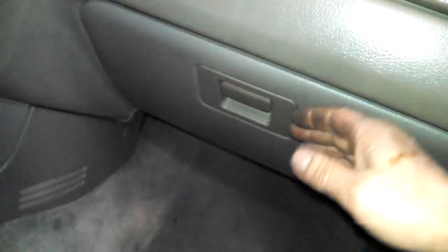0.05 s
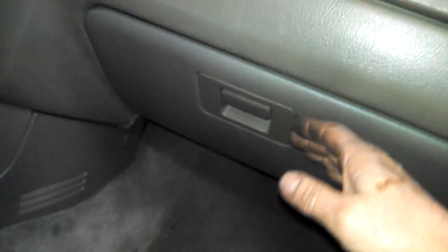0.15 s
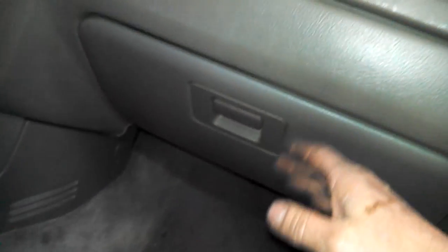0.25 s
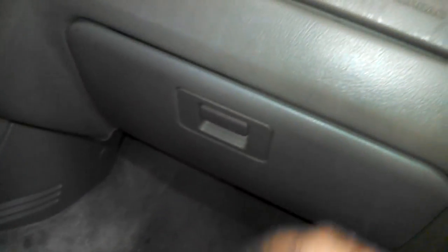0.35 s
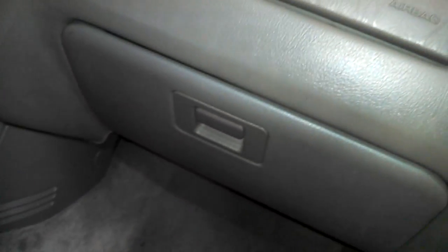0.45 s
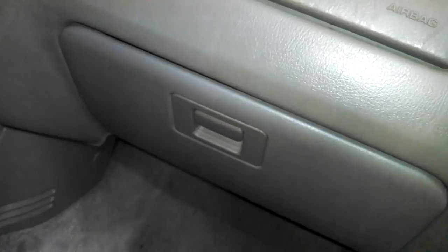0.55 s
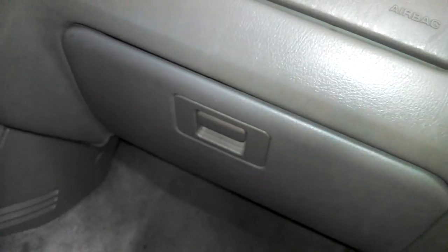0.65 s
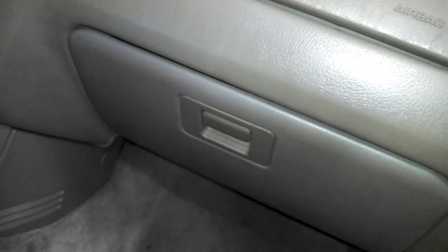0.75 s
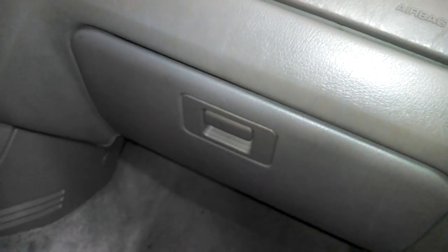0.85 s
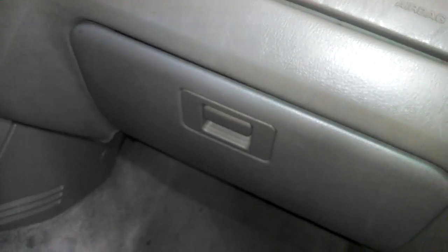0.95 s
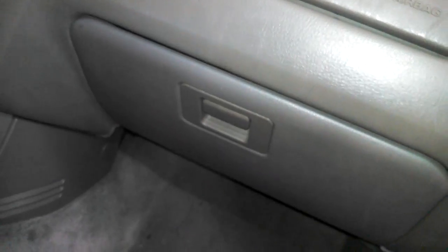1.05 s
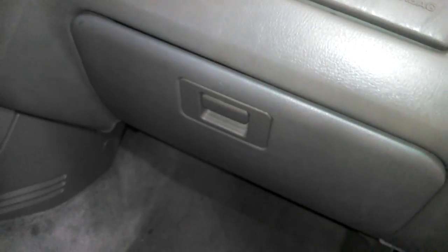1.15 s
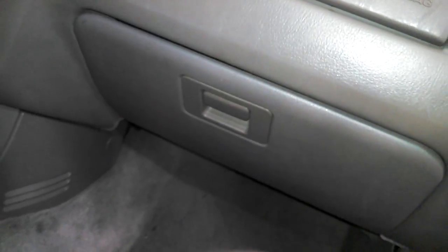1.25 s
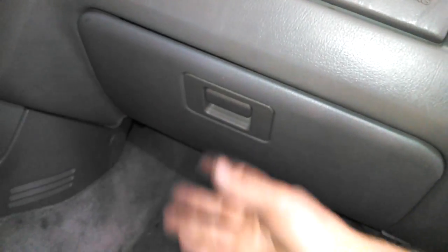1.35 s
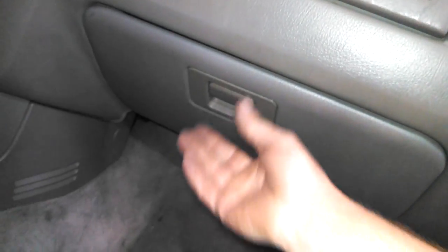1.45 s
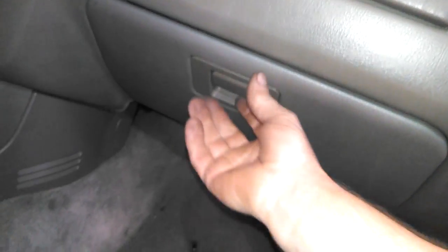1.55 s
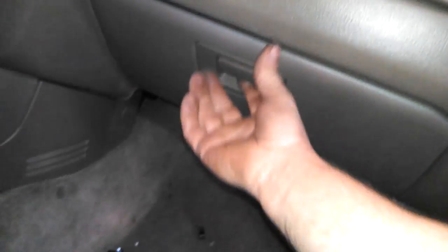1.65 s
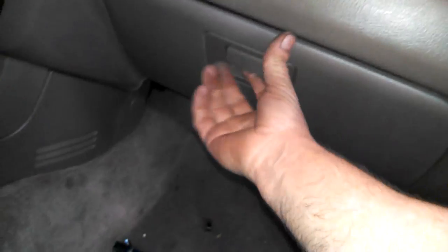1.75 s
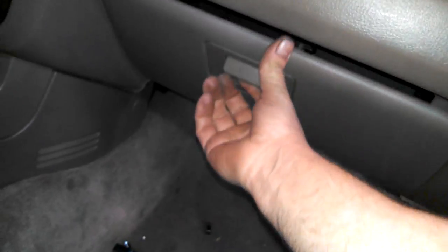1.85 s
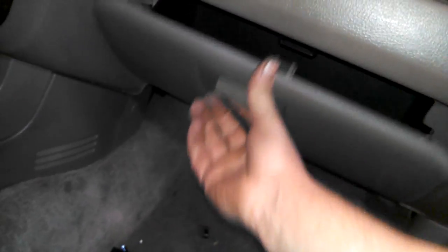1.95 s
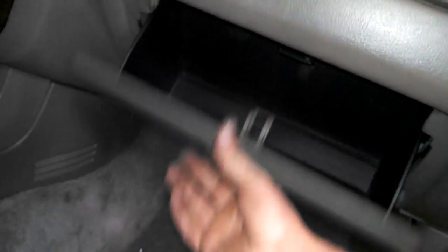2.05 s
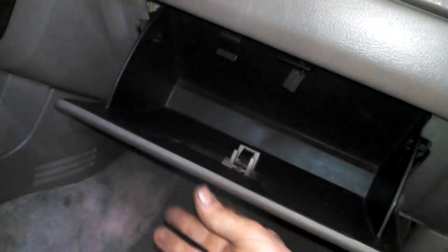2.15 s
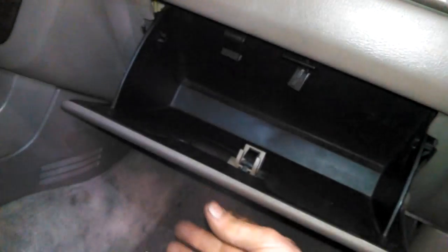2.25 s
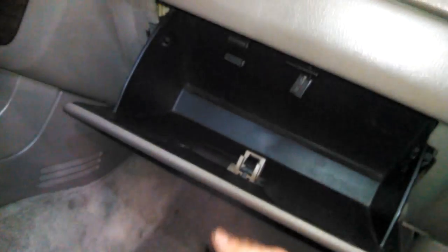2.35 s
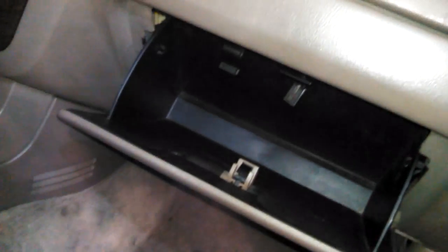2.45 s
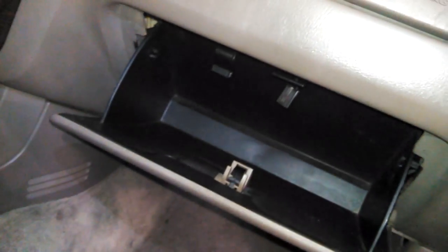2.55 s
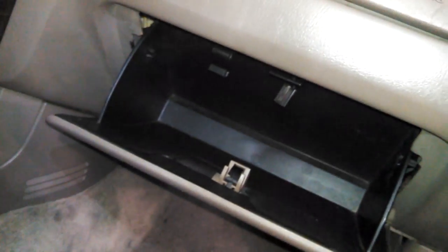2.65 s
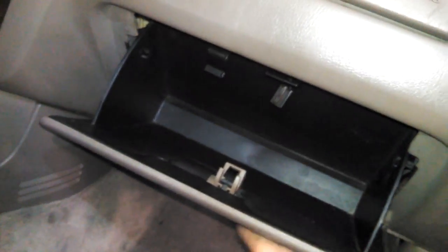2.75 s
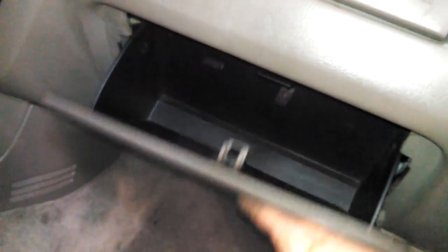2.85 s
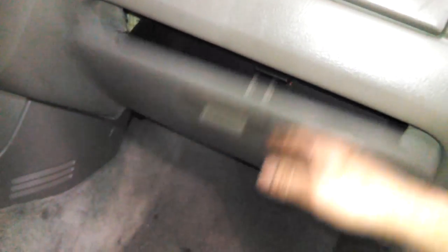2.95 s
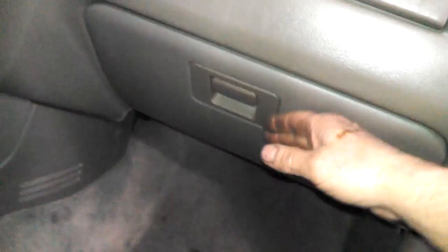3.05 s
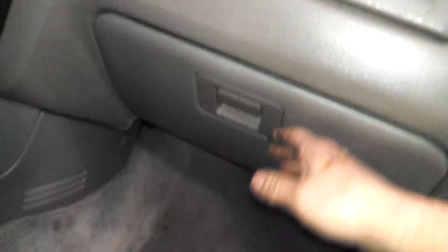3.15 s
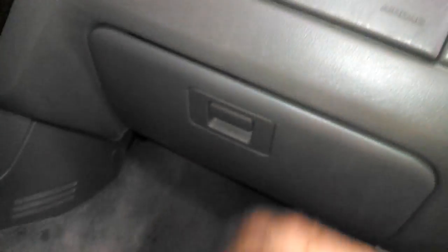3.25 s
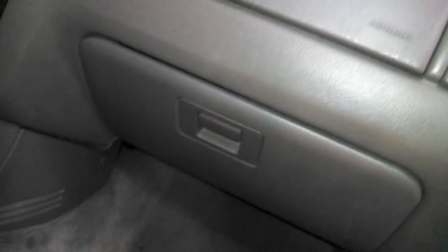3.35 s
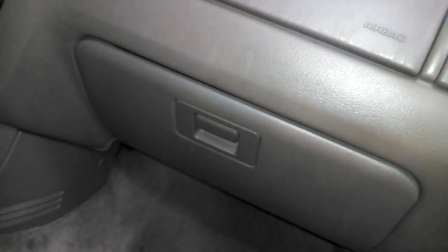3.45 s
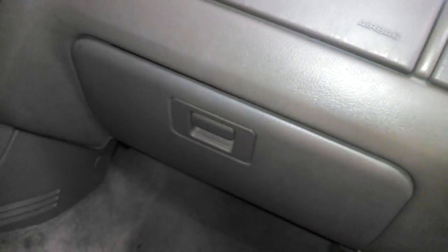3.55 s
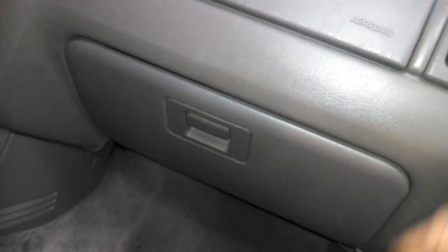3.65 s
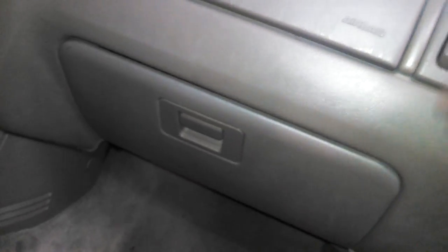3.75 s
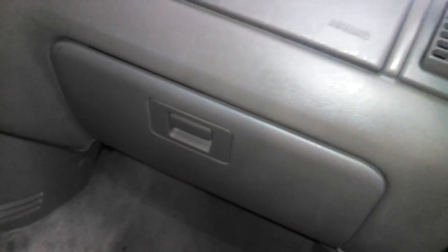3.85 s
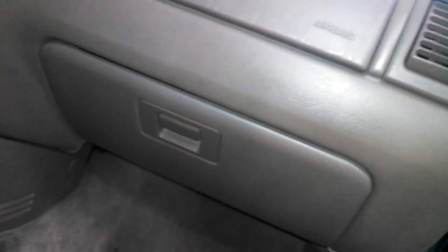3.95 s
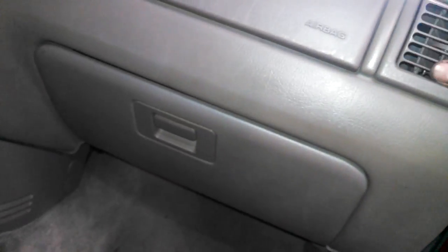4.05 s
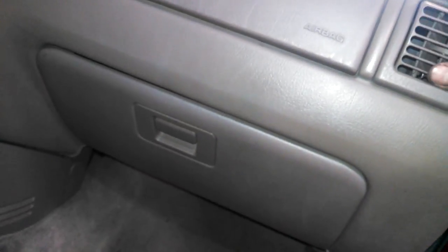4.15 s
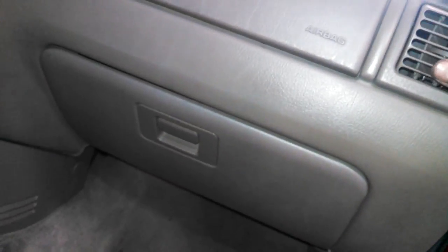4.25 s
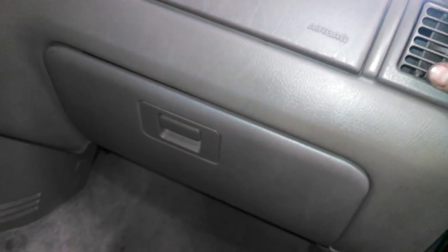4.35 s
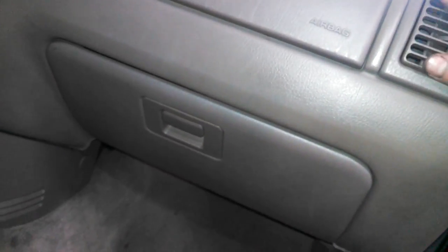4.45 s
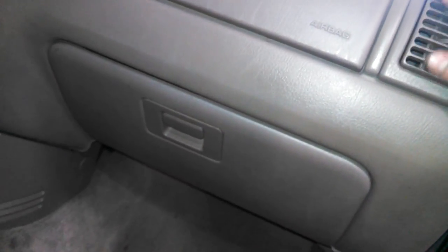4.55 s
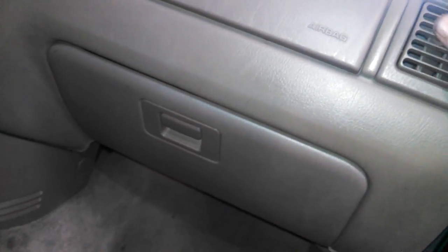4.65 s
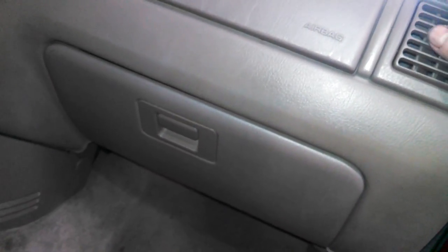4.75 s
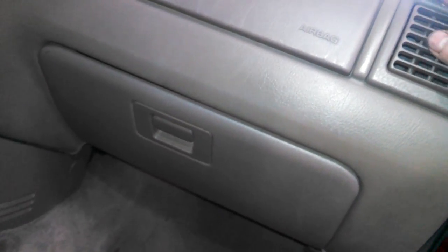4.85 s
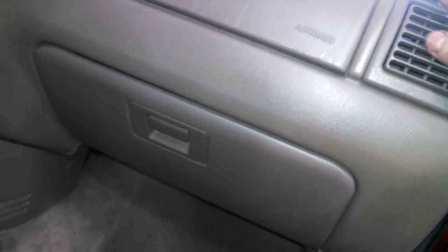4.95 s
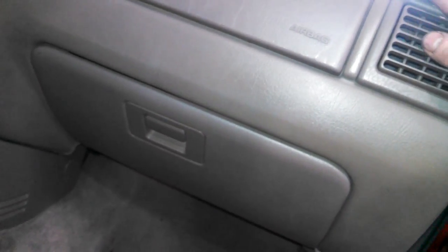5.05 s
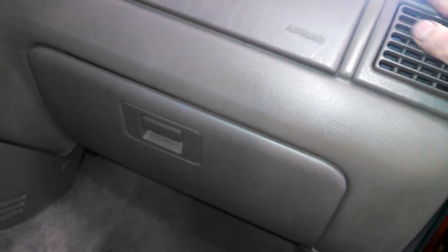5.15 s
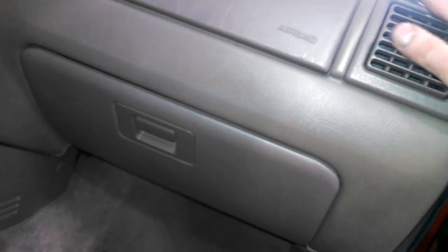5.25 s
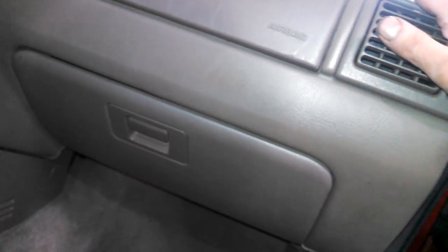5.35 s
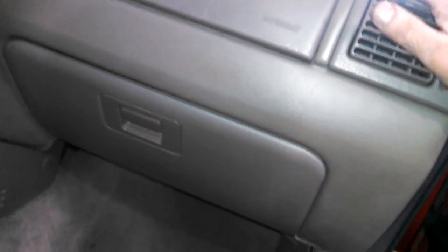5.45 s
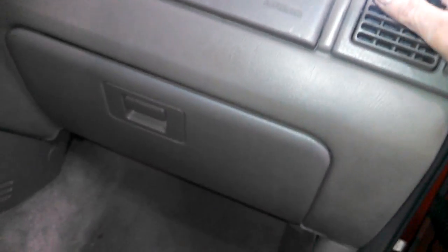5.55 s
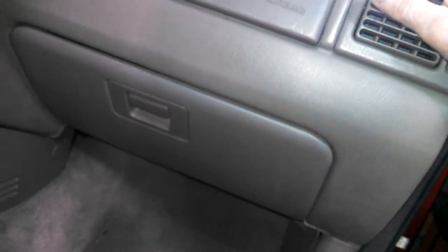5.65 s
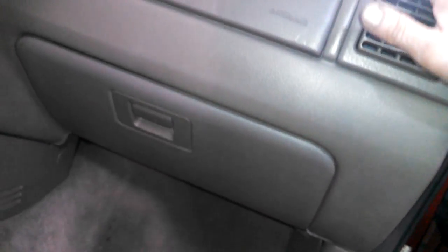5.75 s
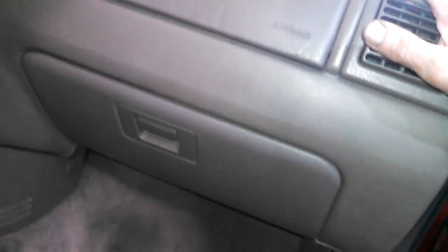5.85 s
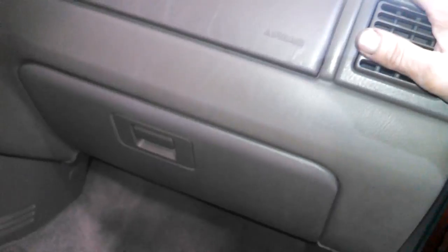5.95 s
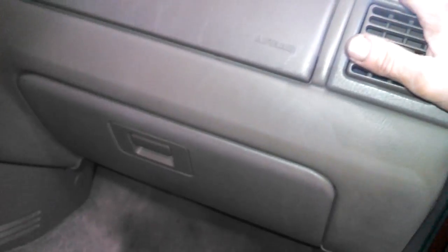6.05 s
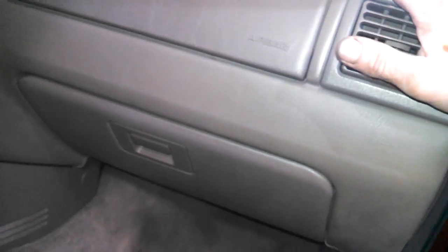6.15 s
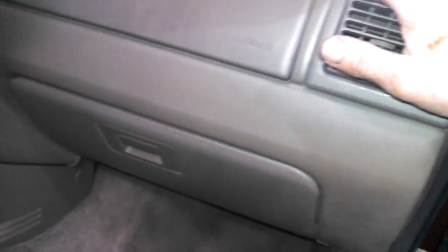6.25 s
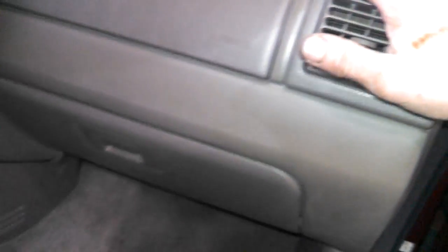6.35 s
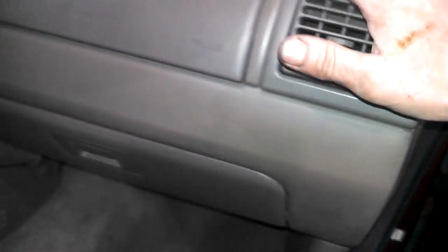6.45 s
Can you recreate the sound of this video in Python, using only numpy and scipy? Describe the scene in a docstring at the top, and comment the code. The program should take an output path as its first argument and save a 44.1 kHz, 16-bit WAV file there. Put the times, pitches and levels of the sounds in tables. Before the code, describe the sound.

A handheld stereo microphone near the dashboard catches a glove box door clattering shut, sharp and springy with a hollow plastic thud. After a pause the latch clicks, the lid thumps open, and soon it bangs shut again. Fan air and engine idle run throughout, dipping in loudness after each slam and slowly creeping back, ending in plain, brighter air rush.

```python
"""Inside a car, with the blower on and the engine idling, a plastic glove box door slams, is unlatched,
drops open and slams again. Contacts are noise bursts with ringing modes of latch spring and panel; blower
and engine are shaped noise; dull low swells and knocks, high squeaks and a brief hiss are added. Two
microphone ports hear the cabin out of step, and gain control ducks hard at each slam, then creeps back."""
import sys
import numpy as np
from scipy import signal
from scipy.fft import rfft, irfft, next_fast_len
from scipy.io import wavfile
from scipy.ndimage import uniform_filter1d, map_coordinates

SR = 44100
rng = np.random.default_rng(int(sys.argv[2]) if len(sys.argv) > 2 else 0)


def output_pcm(signal):
    """Save a mono or channel-first signal as 16-bit PCM at the path in sys.argv[1].

    Samples are clipped to [-1, 1] before scaling.
    """
    pcm = np.clip(np.atleast_2d(signal).T, -1, 1) * 32767
    wavfile.write(sys.argv[1], SR, np.round(pcm).astype(np.int16))


N = 286307  # samples

# All levels hold ahead of the ports and the gain control; spectra and mode levels are relative.
# Contacts of door and latch: t/s, snap level/dB, rattle level/dB, rattle t60/s, spring level/dB, tilt/(dB/octave)
CONTACTS = [(0.2439, -23, -31.5, 0.096, -19.5, -4), (0.2548, -30, -32, 0.054, -36, -4),
            (0.2734, -22, -22.5, 0.11, -18, -2), (0.2748, -18, -31, .05, -19, 0),
            (0.2831, -14, -22.5, 0.073, -11, 2), (0.2856, -13.5, -24, 0.096, -16, 2),
            (0.439, -31, -32, .07, -29, -6), (2.0078, -33, -28, 0.083, -41, -3),
            (2.0127, -15, -27, 0.072, -18.5, 0.5), (2.288, -21.5, -25.5, 0.053, -33, 0.5),
            (3.0346, -30, -39, .05, -36, -2), (3.1321, -28.5, -39, .06, -35.5, -5.5),
            (3.1346, -28.5, -33, 0.054, -42, 4.5), (3.227, -21, -20.5, 0.098, -20, 0),
            (3.2374, -11, -23, 0.11, -11, 1.5)]
# Spectral density of snap and rattle before the tilt: f/Hz, level/dB
SNAP_SPECTRUM = [(300, -33), (1000, -9.5), (1800, 1), (3500, -6.5), (5000, -4.5), (7000, -10.5), (9500, -4),
                 (11500, -15), (14000, -6.5), (15500, -15), (16500, -42)]
# Modes of the latch spring: f/Hz, level/dB, t60/s
LATCH_MODES = [(3420, -20, 0.12), (4100, -31, 0.19), (4540, -12, 0.061), (4910, -9.5, 0.041),
               (6100, -15, 0.038), (7300, -14.5, 0.053), (8600, -29, 0.22)]
# Blows that ring the door panel: t/s, level/dB, centre of the excited modes f/Hz, ring time/free ring time
PANEL_BLOWS = [(0.2446, -24, 480, .8), (0.2496, -11, 950, 0.53), (0.2734, -12, 1500, .5),
               (0.276, -11, 480, 0.84), (0.4385, -33, 2000, 0.54), (0.439, -18.5, 950, 0.85),
               (2.0126, -24, 2100, 0.76), (2.018, -24.5, 706, 1), (2.2886, -12, 1750, .5),
               (2.2918, -18, 1710, 0.56), (2.298, -25, 500, 1.05), (3.034, -28, 2000, 1.2),
               (3.1328, -18.5, 1800, 0.69), (3.227, -16.5, 1700, .8), (3.229, -11, 480, .8),
               (3.2372, -17, 2000, 1.1), (3.243, -13.5, 170, 1.05)]
# Modes of the freely ringing door panel: f/Hz, level/dB, t60/s
PANEL_MODES = [(147, -3, 0.11), (247, -2.5, 0.11), (377, -6, 0.071), (504, 4, 0.051), (755, -5.5, 0.074),
               (929, -3.5, 0.064), (1255, -0.5, 0.045), (1601, -1.5, 0.036), (1920, -8.5, 0.039),
               (2440, 0, 0.042)]
# Mean level of the blower's rush before the treble lift: t/s, level/dB
BLOWER_LEVEL = [(0, -30.5), (.22, -27.5), (.5, -33.5), (1.8, -34), (2.3, -32), (3, -31), (3.6, -35.5),
                (4.5, -34.5), (5.1, -35), (5.5, -34.5), (5.9, -31.5), (6.49, -33)]
# Lift of the blower's treble: t/s, level/dB
TREBLE_LIFT = [(0, -3.5), (2.3, -2), (3, -2.5), (5.8, -0.8), (6.49, 2.5)]
# Spectral density of the rush: f/Hz, level/dB
RUSH_SPECTRUM = [(60, -49), (150, -5), (330, -9), (700, -9.5), (1300, -18), (2500, -22), (5000, -28.5),
                 (6500, -29.5), (9400, -29.5), (11000, -35), (15500, -32)]
# Resonances of the air ducts: f/Hz, width/Hz, level/dB
DUCT_RESONANCES = [(262.8, 18.6, -3.5), (411.6, 48, 0.5), (510, 120, 0.5), (742, 38, -9), (844, 21, -7.5),
                   (1000, 51, -12), (1533, 64, -11.5), (2030, 39, -18), (2400, 57, -17.5),
                   (3160, 220, -19.5), (4460, 37, -27), (4670, 33, -24), (4970, 54, -25), (9050, 110, -30),
                   (9960, 53, -46)]
# Mean level of the idle boom: t/s, level/dB
ENGINE_LEVEL = [(0, -33.5), (1.5, -34), (3, -32.5), (4, -35), (5, -34.5), (5.5, -34.5), (5.9, -32.5),
                (6.49, -33)]
# Spectral density of the boom: f/Hz, level/dB
BOOM_SPECTRUM = [(20, -27), (35, -32), (46, -11), (60, -0.5), (80, -7.5), (113, 0.5), (135, -7), (170, -18),
                 (300, -34), (600, -90)]
# Dull low swells and knocks: t/s, level/dB, f/Hz, length/s;
# the one at 3.81 s is a chance swell of the low noise
DULL_SWELLS = [(0.156, -33.5, 306, 0.15), (1.77, -39, 127, 0.038), (3.08, -29.5, 460, 0.028),
               (3.19, -32, 320, 0.13), (3.81, -33.5, 120, 0.1)]
# Faint squeaks while the door hangs open: t/s, length/s, start f/Hz, end f/Hz, level/dB
SQUEAK_GLIDES = [(2.6, .065, 11700, 15500, -52), (2.78, .07, 15100, 13200, -50),
                 (2.76, .08, 12300, 11900, -51)]
# Spectral density of the hiss: f/Hz, level/dB
HISS_SPECTRUM = [(9000, -41), (11500, -9), (12700, -8), (14000, -2), (15500, -11)]
# Right port against left: f/Hz, phase turn/rad (capped at pi), level/dB, likeness (0-1),
# likeness of sum and difference (0-1)
PORT_RELATION = [(30.3, -3.5, 8, 0.99, 0.95), (66, -2.5, -3.5, 0.93, 0.99), (112, -1.36, -8.5, 0.8, 1),
                 (188, -1, 0, 0.62, 1), (272, -0.82, 0, 0.91, 1), (396, 0.5, 0.2, 0.85, 0.95),
                 (528, 0.56, -0.5, 0.67, 0.95), (650, 1.5, -1.5, .25, 0.97), (758, 3, -1, 0.92, .3),
                 (990, 3, -1, 0.99, .6), (1470, 3, 0.5, 1, 1), (2020, 3, 3, 0.84, 1),
                 (2650, 3, 0, 0.99, 0.7), (2770, 3.5, 1, 1, 0.5), (4600, 3, 2, 1, 0.94),
                 (15100, 4, 3, 0.99, 0.87)]

SNAP_T60_S, SNAP_RISE_S = 0.0079, 0.00012
CHATTER_DB, CHATTER_HZ = 3.5, 500  # depth and knot rate of the rattle's unevenness
TAIL_DB, TAIL_T60_S, TAIL_HZ = -13, 0.22, 6500  # murmur of the hollow box, level against the rattle
SPRING_RISE_S, THUD_RISE_S = 0.001, 0.0019
REACH_DB = 11  # panel modes an octave from the centre are this much weaker
WHOOSH_DB, WHOOSH_GROWS = 2.5, 1  # lift near 1 kHz: offset, and dB per dB of treble lift
HISS_S, HISS_HOLD_S, HISS_DB, HISS_FADE_DB_PER_S = 0.63, 0.22, -46, 60
LAG_S, EVEN_HZ = 16 / SR, 5200  # delay of the right port; no level difference from EVEN_HZ up
LOW_HZ, EDGE_HZ, TOP_HZ = 38, 15550, 16500  # low cut, top of the steady sounds, top of everything


def amp(db):
    """Decibel law: amplitude gain of a level in dB."""
    return 10 ** (np.asarray(db) / 20)


def unit(x):
    """Normalisation to an rms amplitude of 1."""
    return x / np.sqrt(np.mean(x ** 2) + 1e-20)


def along(points, hz):
    """Interpolation of each column after the frequency, on a logarithmic axis."""
    f, *cols = np.transpose(points)
    return [np.interp(np.log(hz + 1), np.log(f + 1), c) for c in cols]


def curve(rows):
    """Linear interpolation of a level in time, one value per sample."""
    s, level = np.transpose(rows)
    return np.interp(np.arange(N) / SR, s, level)


def wobble(rate):
    """Slow random modulation: a smooth curve through rate random knots a second."""
    knots = rng.standard_normal(int(N * rate / SR) + 4)
    return map_coordinates(knots, [np.arange(N) * rate / SR])


def filtered(x, response):
    """Linear filtering: the spectrum of x times a response, real or complex."""
    m = next_fast_len(x.shape[-1] + 8192)
    spectrum = rfft(x, m) * response(np.fft.rfftfreq(m, 1 / SR))
    return irfft(spectrum, m)[..., :x.shape[-1]]


def noise(gain):
    """Coloured noise: two independent draws of one spectrum, joint rms 1."""
    return unit(filtered(rng.standard_normal((2, N)), gain))


def ring(modes, t, spread):
    """Modal decay: damped sines at random strengths, with slightly shifted pitches in each draw."""
    out = 0
    for hz, db, t60 in modes:
        decay = amp(db + rng.normal(0, 2.8) - 60 * t / t60)
        shift = rng.normal(1, spread, (2, 1))
        out = out + decay * np.sin(2 * np.pi * hz * t * shift)
    return out


def contact_noise(t, chatter, snap_db, rattle_db, rattle_t60, tilt_db):
    """Impact noise: a fast-decaying snap and a slower rattle, over a duller murmur of the hollow box."""
    shape = amp(snap_db - 60 * t / SNAP_T60_S) + chatter * amp(rattle_db - 60 * t / rattle_t60)
    shape *= 1 - np.exp(-t / SNAP_RISE_S)

    def colour(hz):
        return amp(along(SNAP_SPECTRUM, hz)[0] + tilt_db * np.log2((hz + 1) / 4000))

    grit = filtered(rng.standard_normal((2, len(t))), colour)
    burst = unit(shape * grit) * np.sqrt(np.mean(shape ** 2))
    # reversed in time, the same grit serves as a separate noise
    murmur = unit(filtered(grit[:, ::-1], lambda hz: 1 / (1 + (hz / TAIL_HZ) ** 4)))
    return burst + amp(rattle_db + TAIL_DB - 60 * t / TAIL_T60_S) * murmur


def door():
    """Impact excitation: contacts snap, rattle and ring the latch spring; blows ring the panel's modes."""
    # two draws, as the ports differ a little; each event lasts a quarter second
    out, t = np.zeros((2, N + SR)), np.arange(SR // 4) / SR
    loose = amp(CHATTER_DB * wobble(CHATTER_HZ))  # loose parts chatter unevenly
    for s, snap_db, rattle_db, rattle_t60, spring_db, tilt_db in CONTACTS:
        start = round(s * SR)
        chatter = np.roll(loose, -start)[:len(t)]
        burst = contact_noise(t, chatter, snap_db, rattle_db, rattle_t60, tilt_db)
        spring = amp(spring_db) * ring(LATCH_MODES, t, 0.0126) * (1 - np.exp(-t / SPRING_RISE_S))
        out[:, start:start + len(t)] += burst + spring
    for s, db, centre_hz, free in PANEL_BLOWS:
        start = round(s * SR)
        struck = [(hz, level - REACH_DB * np.log2(hz / centre_hz) ** 2, t60 * free)
                  for hz, level, t60 in PANEL_MODES]
        rise = (1 - np.exp(-t / THUD_RISE_S)) ** 2
        out[:, start:start + len(t)] += amp(db) * ring(struck, t, 0.024) * rise
    return out[:, :N]


def blower():
    """Turbulence noise: air rings the ducts and rushes from the vents, slowly growing brighter."""
    treble_db = curve(TREBLE_LIFT)
    whoosh_db = WHOOSH_DB + WHOOSH_GROWS * treble_db

    def colour(hz):
        rush = amp(2 * along(RUSH_SPECTRUM, hz)[0])  # powers add
        ducts = sum(amp(2 * db) / (1 + (2 * (hz - centre) / width) ** 2)
                    for centre, width, db in DUCT_RESONANCES)
        return np.sqrt(rush + ducts * (hz > 100))

    air = noise(colour)
    whoosh = filtered(air, lambda hz: np.exp(-np.log2((hz + 1) / 1100) ** 2 / 0.24))
    treble = filtered(air, lambda hz: hz ** 2 / (hz ** 2 + 2500 ** 2))
    lifted = air + (amp(whoosh_db) - 1) * whoosh + (amp(treble_db) - 1) * treble
    return amp(curve(BLOWER_LEVEL) + 1.06 * wobble(12)) * lifted


def engine():
    """Cabin resonance: the idle fills the lowest resonances with an uneven boom."""
    boom = noise(lambda hz: amp(along(BOOM_SPECTRUM, hz)[0]))
    return amp(curve(ENGINE_LEVEL) + 1.9 * wobble(7.7)) * boom


def dull_swells():
    """Band-limited noise: low swells and knocks, each about an octave wide, under a bell-shaped envelope."""
    out, t = np.zeros((2, N)), np.arange(N) / SR
    for s, db, hz, length in DULL_SWELLS:
        swell = amp(db) * np.exp(-(2 * (t - s) / length) ** 2)
        out += swell * noise(lambda f: np.exp(-np.log2((f + 1) / hz) ** 2 / 1.16))
    return out


def squeaks():
    """Frequency modulation: thin sine glides swell and fade, with unsteady pitch and level."""
    out, t = np.zeros(N), np.arange(N) / SR
    for s, length, from_hz, to_hz, db in SQUEAK_GLIDES:
        u = np.clip((t - s) / length, 0, 1)
        hz = from_hz + (to_hz - from_hz) * u + 60 * wobble(250)
        swell = np.sin(np.pi * u) * amp(db + 2.5 * wobble(120))
        out += swell * np.sin(2 * np.pi * np.cumsum(hz) / SR)
    return out


def hiss():
    """High-pass noise: one thin hiss starts quickly, holds and decays exponentially."""
    t = np.arange(N) / SR
    fade_db = HISS_FADE_DB_PER_S * np.maximum(0, t - HISS_S - HISS_HOLD_S)
    rise = np.clip((t - HISS_S) / 0.04, 0, 1)
    return rise * amp(HISS_DB - fade_db) * noise(lambda hz: amp(along(HISS_SPECTRUM, hz)[0]) * (hz > 8000))


def ports(pair):
    """Partial coherence: left hears the first draw, right a late, phase-turned blend of both.

    The second draw also loosens the difference of the ports from their sum where that likeness is below 1."""
    def both(hz):
        turn, db, alike, tied = along(PORT_RELATION, hz)
        turn = np.minimum(turn, np.pi)  # the treble arrives in opposite polarity
        alike, tied = np.clip(alike, 0, 1), np.clip(tied, 0, 1)
        late = amp(db * (hz < EVEN_HZ)) * np.exp(1j * (turn - 2 * np.pi * hz * LAG_S))
        loose = (1 - late) / 2 * np.array([tied - 1, np.sqrt(1 - tied ** 2)])
        left = np.array([[1], [0]]) + loose
        right = late * np.array([alike, np.sqrt(1 - alike ** 2)]) - loose
        return np.array([left, right])
    return filtered(pair, both).sum(axis=1)


def scene():
    """Superposition: all sources as the two ports hear them; the door is nearer the right port."""
    steady = filtered(blower() + engine() + squeaks() + hiss(), lambda hz: hz < EDGE_HZ)
    nearer_right = amp([[-0.8], [0.8]])
    return ports(door()) * nearer_right + ports(steady + dull_swells())


def record(dry, limit_db=-35, climb_db=8.5, fall=0.036):
    """Gain control led by the treble: past limit_db the gain sinks in tens of ms, then climbs.

    climb_db is in dB per second; fall is the smoothing time constant in seconds."""
    heard = filtered(dry, lambda hz: hz / (hz + 1000))
    power = np.abs(uniform_filter1d(np.mean(heard ** 2, axis=0), size=177, origin=88))
    needed_db = np.minimum(0, limit_db - 10 * np.log10(power + 1e-12))
    # a running minimum against a ramp recovers at the climb rate
    ramp = climb_db * np.arange(N) / SR
    gain_db = np.minimum(0, np.minimum.accumulate(needed_db - ramp) + ramp)
    keep = np.exp(-1 / (fall * SR))
    smooth_db = signal.lfilter([1 - keep], [1, -keep], gain_db)
    return filtered(dry * amp(smooth_db), lambda hz: (hz < TOP_HZ) * hz ** 4 / (hz ** 4 + LOW_HZ ** 4))


dry = scene()
out = record(dry)
output_pcm(out)
```